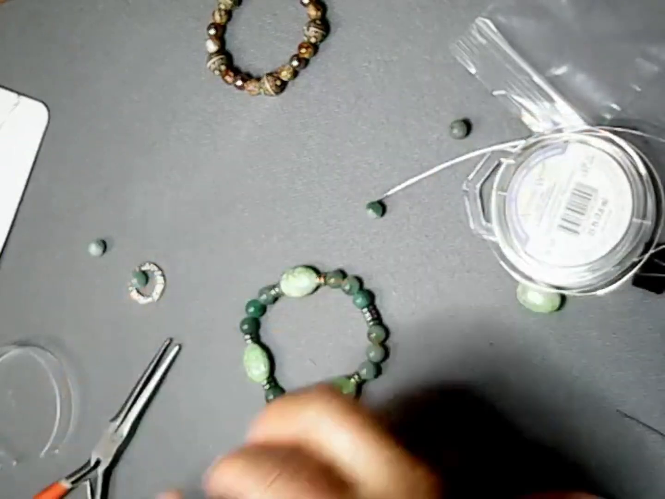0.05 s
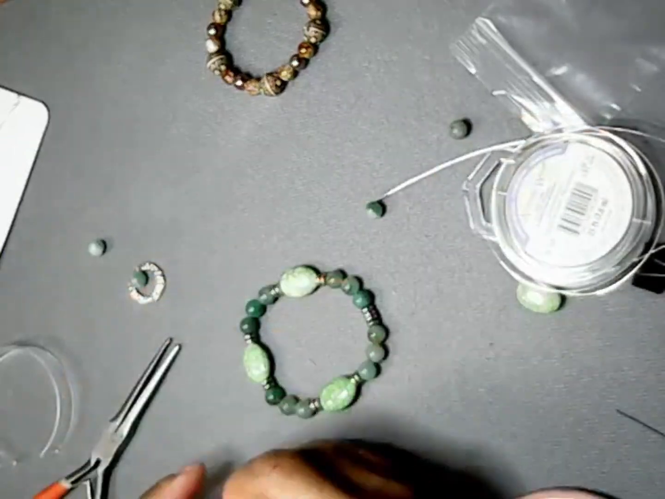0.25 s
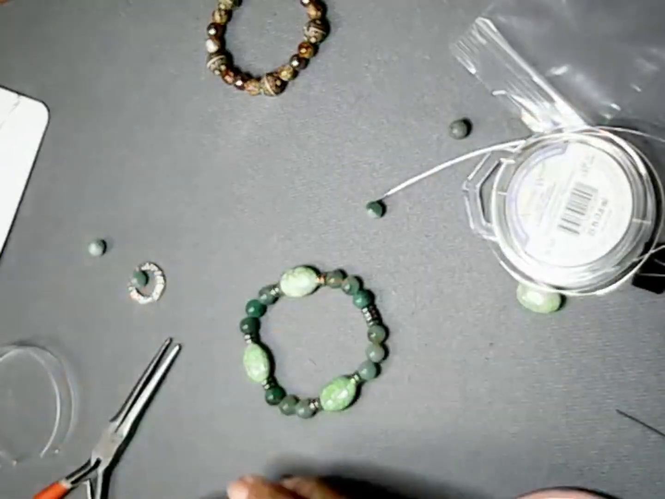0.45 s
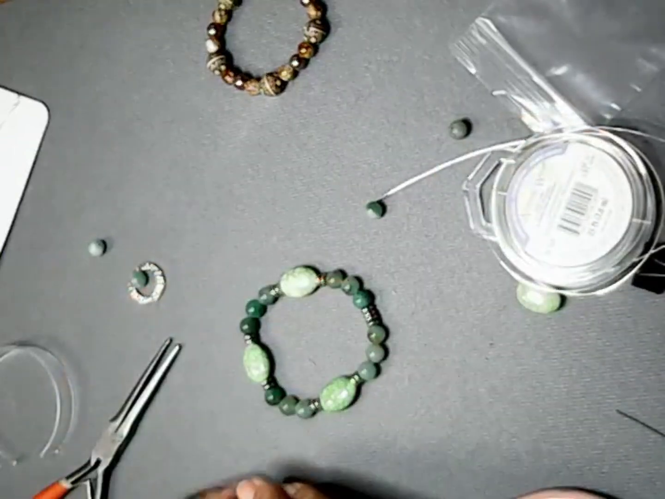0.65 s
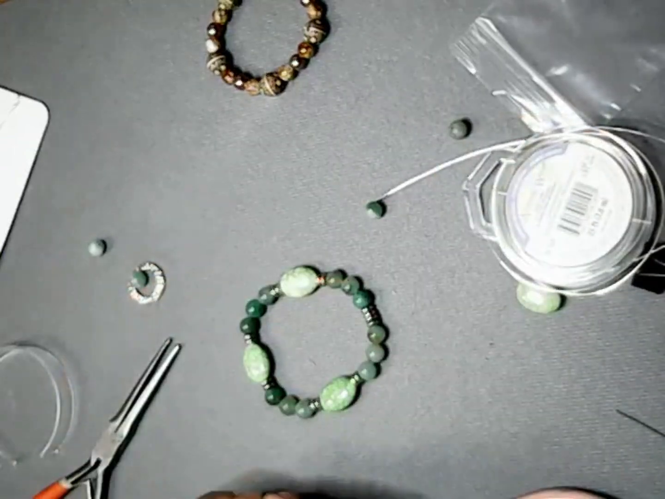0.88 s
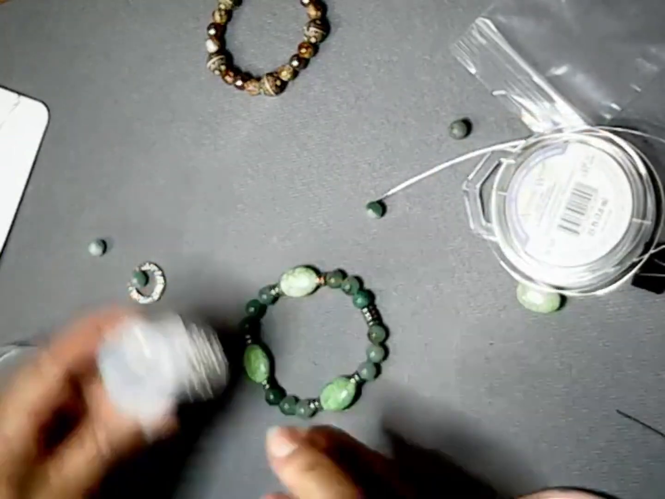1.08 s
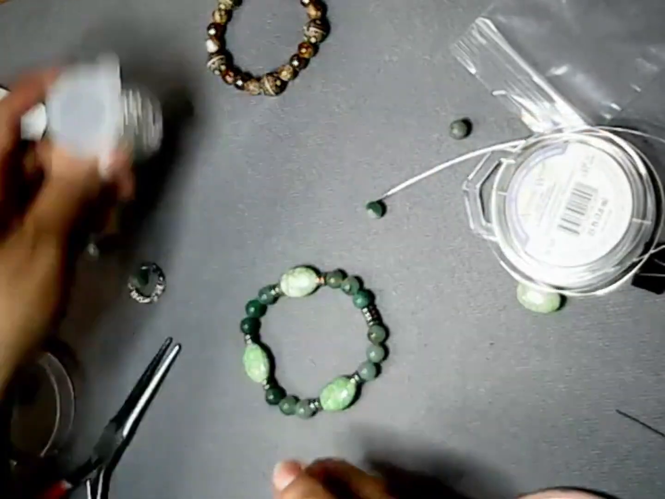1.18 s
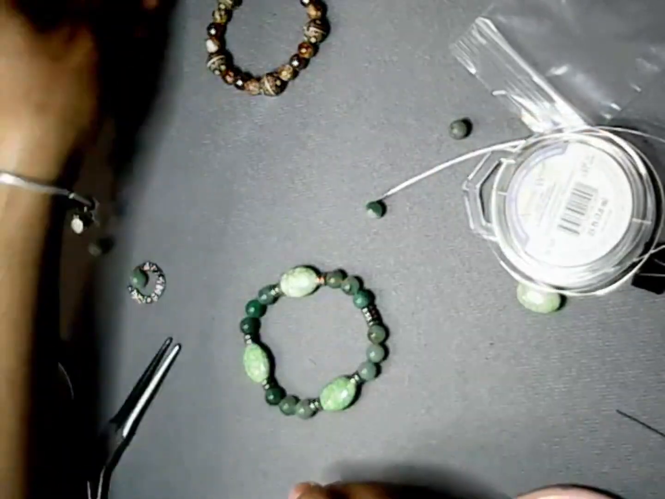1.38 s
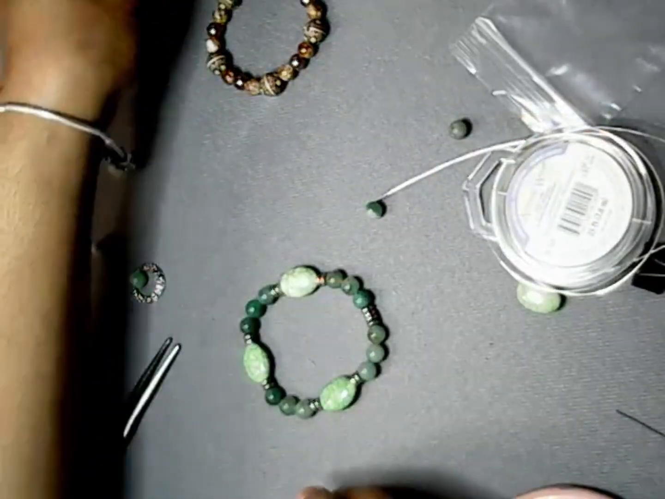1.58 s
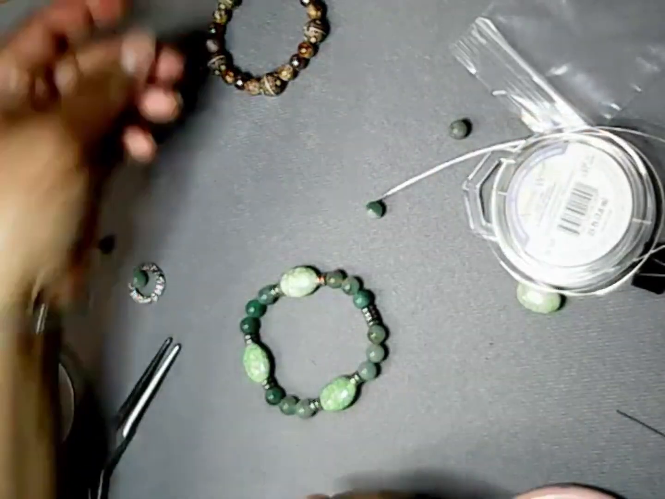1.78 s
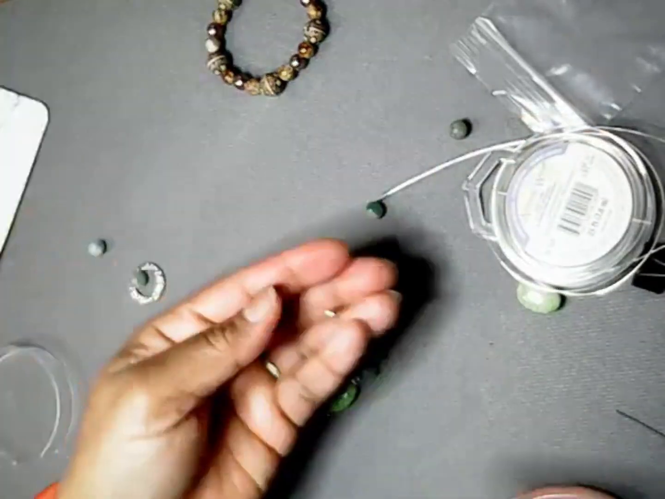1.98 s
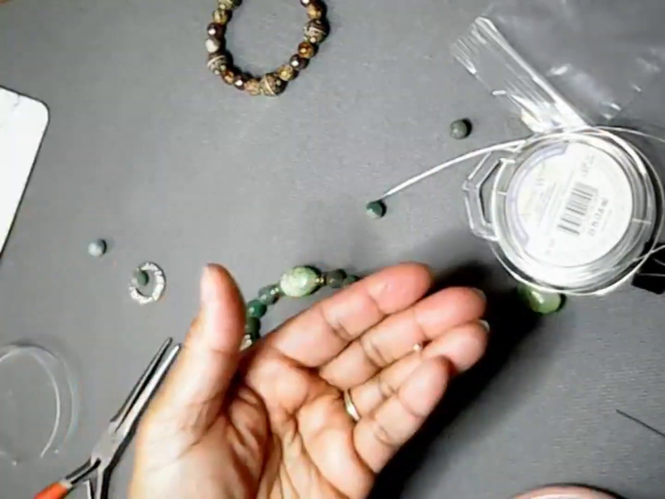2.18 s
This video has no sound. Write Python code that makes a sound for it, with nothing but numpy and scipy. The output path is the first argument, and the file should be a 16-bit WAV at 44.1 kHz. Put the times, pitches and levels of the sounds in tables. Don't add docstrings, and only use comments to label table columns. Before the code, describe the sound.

A bead tub is handled up close: light plastic knocks and glassy chinks, one hard clipped snap, faint touches, then a dense bead rattle at the end, over steady mains hum, hiss and tiny dropout ticks.

```python
import sys
import numpy as np
from scipy import signal
from scipy.fft import rfft, irfft
from scipy.io import wavfile
from scipy.ndimage import uniform_filter1d

SR = 44100
rng = np.random.default_rng(int(sys.argv[2]) if len(sys.argv) > 2 else 0)


def magnitude_from_level(level_db):
    exponent = np.asarray(level_db, float) / 20
    return 10 ** exponent


def to_wav(s):
    ch = np.atleast_2d(s).T
    pcm = np.round(np.clip(ch, -1, 1) * 32767)
    wavfile.write(sys.argv[1], SR, pcm.astype(np.int16))


N = 99225
N_LOST = 22050

# start in seconds, lost sound in ms.
DROPOUTS = [(.0795, 22.8), (.1795, 23.7), (.2795, 21.5), (.6390, 23.4), (.8295, 21.5), (.9295, 23.2),
            (1.0295, 20), (1.1295, 23.2), (1.2295, 23.7), (1.3295, 23.2), (1.4295, 18), (1.5295, 23.8),
            (1.6295, 19.9), (1.7295, 18.2), (1.8295, 20.1), (1.9295, 21.4), (2.0295, 18.4), (2.1295, 20),
            (2.2295, 20.3)]


def kept_samples():
    start_s, lost_ms = np.array(DROPOUTS).T
    skip = np.zeros(N)
    skip[(start_s * SR).astype(int)] = np.round(lost_ms * SR / 1000)
    return np.arange(N) + np.cumsum(skip).astype(int)


def curve(table, col):
    table = np.array(table)
    return np.interp(np.arange(N) / SR, table[:, 0], table[:, col])


def ring(push, modes, low_hz, high_hz):
    x = np.zeros(N + N_LOST)
    x[kept_samples()] = push
    x = signal.sosfilt(signal.butter(3, [low_hz, high_hz], "band", fs=SR, output="sos"), x)
    out = 0
    for hz, db, t60 in modes:
        radius = np.exp(-np.log(1000) / (t60 * SR))
        angle = 2 * np.pi * hz / SR
        resonator = [1, -2 * radius * np.cos(angle), radius ** 2]
        out = out + magnitude_from_level(db) * signal.lfilter([0, np.sin(angle)], resonator, x)
    return out


def taps(s, db, bounce):
    x, s = np.zeros(N), np.asarray(s)
    luck = rng.random((len(s), 2))
    rebound_s = s + 0.00077 + 0.0056 * luck[:, 0]
    np.add.at(x, (s * SR).astype(int), -magnitude_from_level(db))
    np.add.at(x, (rebound_s * SR).astype(int), bounce * magnitude_from_level(db) * (2 * luck[:, 1] - 1))
    return x


def grains(rate, spread_db):
    u = rng.random((3, N))
    size = magnitude_from_level(-spread_db * np.log(1 - u[2]))
    x = (u[0] < rate / SR) * np.sign(u[1] - .5) * size
    return x / np.sqrt(uniform_filter1d(x ** 2, 2000) + 1e-9)


def flurry(s, db, length_s, rate):
    decay = np.exp(-1 / (length_s * SR))
    return signal.lfilter([1], [1, -decay], taps(s, db, bounce=0)) * grains(rate, 3.04)


def soft(push, contact_s):
    w = np.hanning(max(int(contact_s * SR), 1) + 2)
    return np.convolve(push, w / w.sum())[:N]


def microphone_case(x):
    ring_hz, width_hz, past_case_db = 1130, 330, -9
    swell = signal.lfilter(*signal.iirpeak(ring_hz, ring_hz / width_hz, fs=SR), x)
    return swell + magnitude_from_level(past_case_db) * x


# frequency in Hz, level in dB per Hz.
HISS_SPECTRUM = [(18, -99), (30, -61.5), (123, 2), (174, -28.5), (679, -31.5), (1080, -36), (1330, -42.5),
                 (6840, -55), (7500, -72), (9750, -106), (16500, -120)]


def room():
    hum_hz, hum_start_turns, hum_db = 120, .49, 3
    hiss_db, case_db, case_hz, case_width_hz = -8.5, -12, 1070, 186
    n = N + N_LOST
    f = np.maximum(np.fft.rfftfreq(n, 1 / SR), 1)

    def noise(shape):
        x = irfft(rfft(rng.standard_normal(n)) * shape, n)
        return x / np.std(x)

    def peak(center_hz, width_hz):
        return 1 / np.sqrt(1 + (2 * (f - center_hz) / width_hz) ** 4)

    hz, db = np.array(HISS_SPECTRUM).T
    hiss = noise(magnitude_from_level(np.interp(np.log(f), np.log(hz), np.minimum(db, -14))))
    case = noise(peak(case_hz, case_width_hz)) * magnitude_from_level(3.6 * noise(peak(0, 30)))
    hum = np.cos(2 * np.pi * (hum_hz * np.arange(n) / SR + hum_start_turns))
    tones = (magnitude_from_level(-14) * noise(peak(213, 90)) + magnitude_from_level(-34) * noise(peak(4450, 200))
             + magnitude_from_level(-21) * noise(peak(98, 26)))
    return magnitude_from_level(hum_db) * hum + magnitude_from_level(hiss_db) * hiss + magnitude_from_level(case_db) * case + tones


# time in seconds, level in dB.
GAIN_RIDE = [
    (0.0, -45.5),
    (0.17, -41.5),
    (0.52, -36),
    (1.0, -44),
    (1.39, -46),
    (2.25, -44.5),
]


def gain_control():
    return magnitude_from_level(curve(GAIN_RIDE, col=1))


# time in seconds, level in dB.
SQUEAK_LEVEL = [
    (.01, -75),
    (.022, -55),
    (.055, -54),
    (.08, -60),
    (.11, -120),
]
# frequency in Hz, level in dB, t60 in seconds.
SQUEAK_NOTES = [(1733, 0, 0.055), (1740, -0.5, .02)]


def squeak():
    return ring(magnitude_from_level(curve(SQUEAK_LEVEL, col=1) - 22.5) * grains(1700, 1.2), SQUEAK_NOTES, 1400, 2300)


# time in seconds, level in dB, bead share in dB.
HANDLING = [(0, -50.5, -16), (.2, -31.5, -49), (.25, -24, -39.5), (.37, -29, -31.5), (.5, -41.5, -33),
            (.655, -34.5, -42.5), (.68, -29.5, -40), (.8, -48.5, -41.5), (1.2, -48, -27), (1.24, -44, -20),
            (1.45, -44, -26), (1.6, -51, -25), (1.635, -36.5, -41), (1.74, -35, -34), (1.755, -25, -33.5),
            (1.94, -21, -34.5), (2.015, -29.5, -49), (2.04, -47, -38)]
# frequency in Hz, level in dB, t60 in seconds.
TUB_FLOOR = [(206, 0, 0.031), (280, 0.0015, 0.03)]


def rubbing():
    quiet_db = -47
    over_quiet = np.maximum(magnitude_from_level(curve(HANDLING, col=1)) ** 2 - magnitude_from_level(quiet_db) ** 2, 0)
    push = np.sqrt(over_quiet) * magnitude_from_level(-26)
    late = np.arange(N) > 1.5 * SR
    slips = push * grains(1800, 2)
    on_lid, on_tub = slips * ~late, slips * late
    glass = push * magnitude_from_level(curve(HANDLING, col=2) + 6.5) * grains(2500, 3.5)
    rattle = push * late * magnitude_from_level(-30.5) * grains(2700, 3.5)
    return (ring(on_lid, LID_BODY, 600, 1900)
            + ring(on_lid * magnitude_from_level(-16), LID_LOW, 250, 730)
            + ring(on_lid * magnitude_from_level(-30), LID_EDGE, 1800, 6200)
            + ring(on_tub * magnitude_from_level(-2), TUB_WALL, 620, 1630)
            + ring(on_tub * magnitude_from_level(-11), TUB_CAVITY, 445, 1050)
            + ring(on_tub * magnitude_from_level(-17.5), TUB_FLOOR, 180, 480)
            + ring(glass, [*GLASS_LOW, *GLASS_HIGH], 3500, 9300)
            + ring(rattle, LID_EDGE, 1200, 6300))


# time in seconds, low ring in dB, high ring in dB.
BEAD_CHINKS = [(0.022, -41, -34.5), (0.042, -46, -45), (0.046, -52.5, -52), (0.064, -50.5, -56),
               (.072, -55, -59), (0.116, -54, -68), (.1715, -43, -51), (0.193, -41.5, -48),
               (0.2254, -37.5, -47), (.243, -49, -56), (0.284, -46, -44.5), (.298, -42, -54),
               (0.3409, -30, -45), (0.366, -40.5, -52), (.41, -43.5, -54), (0.467, -58.5, -65),
               (0.5629, -40.5, -51), (.647, -36, -48), (0.93, -46.5, -59), (0.978, -53, -52),
               (1.2281, -38, -33.5), (1.2383, -40, -35), (1.2444, -54, -44), (1.317, -56, -53),
               (1.741, -55, -48), (1.753, -41.5, -34.5), (1.761, -42, -31.5), (1.771, -46, -25),
               (1.78, -50, -29.5), (1.809, -45.5, -33.5), (1.8466, -37.5, -37.5), (1.854, -40, -38),
               (1.881, -41, -43), (1.904, -33, -33.5), (1.9118, -32, -37), (1.929, -50, -51.5),
               (1.95, -43, -46), (1.97, -45, -52), (1.99, -52, -63)]
# frequency in Hz, level in dB, t60 in seconds.
GLASS_LOW = [(4458, 0, 0.022), (4240, -8, 0.0094), (4650, -3.5, 0.0038)]
GLASS_HIGH = [(5380, -6.5, 0.0041), (5610, -1.5, 0.017), (6070, -12, 0.0054), (6760, -9, 0.013)]


def bead_chinks():
    s, low_db, high_db = np.array(BEAD_CHINKS).T
    length_s = 0.0063
    return (ring(flurry(s, low_db - 24.5, length_s, 4400), GLASS_LOW, 3800, 5370)
            + ring(flurry(s, high_db - 25.5, length_s, 5700), GLASS_HIGH, 4800, 6370))


# time in seconds, level in dB, hollow part in dB.
BEAD_LANDINGS = [(1.633, -26, -22), (1.645, -39.5, -24), (1.672, -29, -20), (1.684, -34, -23),
                 (1.711, -42, -5), (1.7515, -17, -7), (1.7547, -13, -17), (1.763, -15, -14),
                 (1.7718, -15, -6), (1.7764, -24.5, -12), (1.783, -24.5, -13.5), (1.7969, -11, -5),
                 (1.8008, -11.5, -8), (1.811, -20.5, -5), (1.816, -20.5, -11), (1.8445, -16.5, -6),
                 (1.8481, -9, -9), (1.8533, -7.5, -10.5), (1.8596, -19, -11), (1.885, -19, -28),
                 (1.897, -25.5, -13), (1.9025, -8, -22.5), (1.9055, -11.5, -9), (1.912, -12, -17.5),
                 (1.92, -14.5, -14), (1.9466, -19.5, -6.5), (1.967, -28, -2.5), (1.987, -18.5, -7.5),
                 (2.006, -23, -4)]
# frequency in Hz, level in dB, t60 in seconds.
TUB_WALL = [(1089, -6, 0.037), (1088.5, -7, 0.06), (1340, -15.5, 0.036), (1164, -8.5, 0.016),
            (1870, -18.5, 0.019)]
TUB_CAVITY = [(684.5, 4, 0.043), (751, -2.5, 0.034), (552, -11, 0.093), (303, -18, 0.032)]


def bead_tumble():
    s, db, hollow_db = np.array(BEAD_LANDINGS).T

    def thud(level_db):
        push = taps(s, level_db - 3, bounce=0.15) + flurry(s, level_db - 36, 0.0034, 2500)
        return soft(push, 0.00053)

    return (microphone_case(ring(thud(db + 2.5), TUB_WALL, 596, 2160))
            + ring(thud(db + hollow_db - 1), TUB_CAVITY, 450, 1000))


# time in seconds, peak in dB, bright part in dB, dull part in dB.
LID_KNOCKS = [(0.1177, -25, -17, -20), (0.121, -37, -31.5, -19), (0.13, -28, -30, -11),
              (0.171, -47, -11, -12), (0.184, -31, -10.5, -11), (0.194, -23, -13.5, -11),
              (0.209, -20, -20, -10.5), (0.222, -16, -20.5, -14.5), (0.232, -22, -15, -5.5),
              (0.238, -23.5, -36, -17), (0.254, -30.5, -25, -7), (0.265, -32.5, -17, -13),
              (0.284, -25.5, -15.5, -7.5), (0.296, -25.5, -14, -11), (0.3375, -8, -35, -31),
              (0.35, -31, -27, -24), (0.364, -22, -22, -21), (0.383, -26, -20, -28), (0.4, -14.5, -35, -24),
              (0.436, -32, -28, -23), (0.459, -18.5, -27.5, -25), (0.558, -26, -27, -16),
              (0.572, -25.5, -27, -11), (0.669, -20, -38, -11), (0.685, -26.5, -36, -18.5),
              (0.901, -43, -19, -15), (1.06, -31.5, -13.5, -12), (1.07, -34, -20, -14),
              (1.079, -37, -21, -5), (1.103, -36.5, -17.5, -12), (1.336, -42.5, -24, -12),
              (1.393, -37.5, -23.5, -10.5), (1.426, -41.5, -19, -13)]
# frequency in Hz, level in dB, t60 in seconds.
LID_BODY = [(1038, -0.5, 0.036), (1153, -5.5, 0.016), (1327, -11, 0.016), (1476, -18.5, 0.024),
            (1820, -28, 0.012)]
LID_LOW = [(367, -2.5, 0.046), (502, 0, 0.026), (770, 1, 0.073)]
LID_EDGE = [(2140, 1.5, 0.0089), (2580, -2.5, .012), (3310, 1.5, 0.0039), (4327, -6.5, 0.016),
            (5600, -27, 0.0086)]


def lid_knocks():
    s, db, bright_db, dull_db = np.array(LID_KNOCKS).T

    def knock(level_db):
        push = taps(s, level_db, bounce=0.18) + flurry(s, level_db - 22, 0.0058, 1800)
        return soft(push, 0.00031)

    return (microphone_case(ring(knock(db - 2.5), LID_BODY, 593, 2000))
            + ring(knock(db + dull_db - 3.5), LID_LOW, 230, 670)
            + ring(flurry(s, db + bright_db - 16, 0.0041, 4000), LID_EDGE, 1400, 7000))


# time in seconds, level in dB.
SNAP_BLOWS = [
    (0.6397, -13.5),
    (.6409, -3.5),
    (0.6429, -6),
]
SNAP_REBOUNDS = [
    (0.6497, -12),
    (.657, -15.5),
]
RIM_TICKS = [
    (0.6435, -10),
    (0.662, -40),
    (0.681, -38.5),
    (0.7015, -53),
]
# frequency in Hz, level in dB, t60 in seconds.
SNAP_NOTES = [(119, -33, 0.21), (226.7, -6.5, 0.027), (400, -5.5, 0.015), (835, -7.5, 0.039),
              (1047, 0.5, 0.03), (1358, -14.5, 0.096), (1830, -30, 0.035), (2570, -27, 0.0066),
              (3400, -5, 0.0041), (4250, -29.5, 0.057)]
RIM_NOTES = [(3150, 0.5, 0.0061), (5380, -9, .006), (4270, -17.5, .006), (2720, -16, 0.014)]


def lid_snap():
    def blow(table):
        return taps(*np.array(table).T, bounce=0.022)

    hard = blow(SNAP_BLOWS)
    rebound = soft(blow(SNAP_REBOUNDS), 0.00037)
    s, db = np.array(RIM_TICKS).T
    rim = blow(RIM_TICKS) + flurry(s, db - 16.5, 0.00047, 7800)
    return (ring(hard, SNAP_NOTES, 110, 3500)
            + ring(rebound, SNAP_NOTES, 120, 1400)
            + ring(rim, RIM_NOTES, 2200, 6500))


def scene():
    kept = kept_samples()
    handling = lid_knocks() + lid_snap() + bead_tumble() + bead_chinks() + rubbing() + squeak()
    return (handling[kept] + room()[kept] * gain_control())[None]


def low_pass(x):
    return signal.sosfilt(signal.butter(12, 8960, fs=SR, output="sos"), x)


def record(dry):
    clip = .53
    bass_cut = signal.butter(3, 66, "high", fs=SR, output="sos")
    top_cut = signal.ellip(6, .5, 36, 7100, fs=SR, output="sos")
    rounding = signal.butter(9, 7420, fs=SR, output="sos")
    x = signal.sosfilt(top_cut, signal.sosfilt(bass_cut, dry))
    x = signal.sosfilt(rounding, np.clip(x, -clip, clip))
    return low_pass(x)


dry = scene()
out = record(dry)
to_wav(out)
```